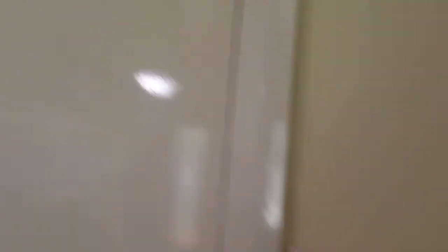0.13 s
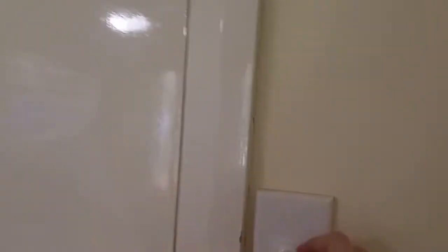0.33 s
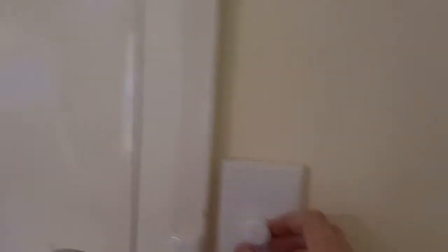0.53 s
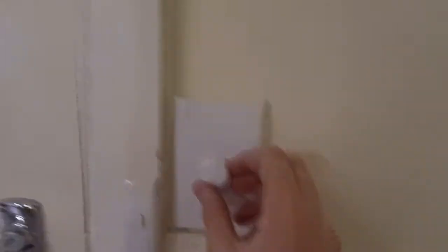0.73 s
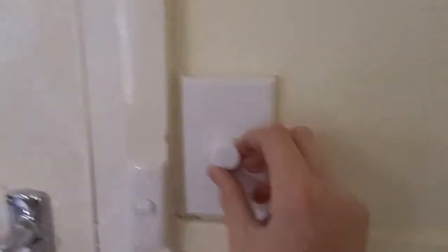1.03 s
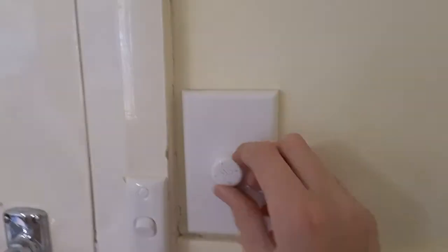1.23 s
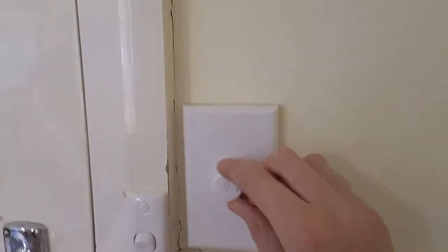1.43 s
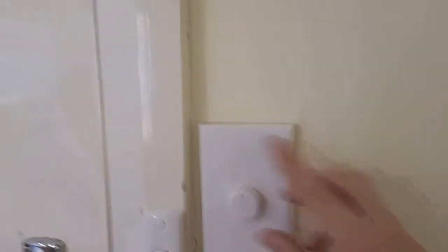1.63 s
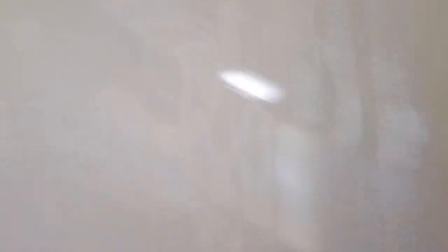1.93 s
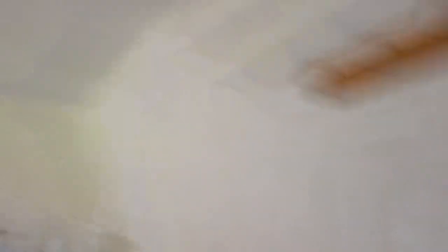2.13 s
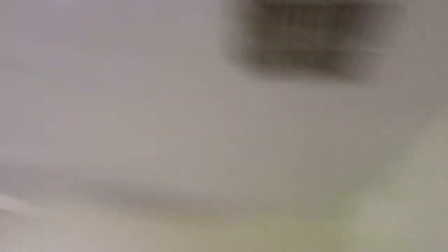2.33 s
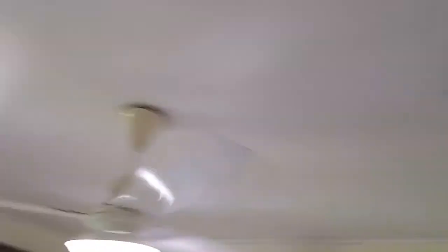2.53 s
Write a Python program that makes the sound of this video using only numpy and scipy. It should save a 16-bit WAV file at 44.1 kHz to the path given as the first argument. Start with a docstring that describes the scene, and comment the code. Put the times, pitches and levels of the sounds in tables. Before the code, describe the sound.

One sharp click from a knob on a wall plate follows some faint ticks and echoes briefly in a small room. A low fan hum swells and fades over faint hiss, with a soft microphone bump and sleeve rustle near the end.

```python
"""A rotary switch on a plastic wall plate is turned by hand: a few soft ticks, then one sharp snap
that rings the plate and echoes in a small, hard room. Fingers rub the knob. A fan hums low,
swelling and fading as the hand-held microphone moves through the room. After the snap the
microphone is bumped and a sleeve rustles. Faint hiss lies under it all."""
import sys
import numpy as np
from scipy import signal
from scipy.fft import rfft, irfft
from scipy.io import wavfile

SR = 44100
rng = np.random.default_rng(int(sys.argv[2]) if len(sys.argv) > 2 else 0)


def dump(signal):
    """Clip the signal to [-1, 1] and save it as 16-bit WAV at the path in sys.argv[1]."""
    limited = np.clip(np.atleast_2d(signal).T, -1, 1)
    pcm = np.round(limited * 32767).astype(np.int16)
    wavfile.write(sys.argv[1], SR, pcm)


N = 119070
TIME, FREQS = np.arange(N) / SR, np.fft.rfftfreq(N, 1 / SR)


def amp(db):
    """Turns decibels into a gain."""
    return 10 ** (np.asarray(db) / 20)


def pan(db):
    """Left and right gains that make the left side louder by db."""
    return amp(np.array([[.5], [-.5]]) * db)


def unit(x):
    """Scales a signal to an average power of 1."""
    return x / np.sqrt(np.mean(x ** 2) + 1e-20)


def fade(t, fade_s):
    """Dies away by 60 dB in fade_s, the fade time."""
    return np.exp(-np.log(1000) * t / fade_s)


def at_freq(table, hz):
    """Looks up a table along a logarithmic frequency axis."""
    freqs, values = np.transpose(table)
    return np.interp(np.log(hz + 1), np.log(freqs + 1), values)


def over_time(table):
    """Joins a table's points with straight lines, one value a sample."""
    return np.interp(TIME, *np.transpose(table))


def add(mix, start_s, sound):
    """Mixes in a stereo sound at start_s."""
    part = mix[:, round(start_s * SR):][:, :sound.shape[1]]
    part += sound[:, :part.shape[1]]


def wobble(hz):
    """A random wobble, up to about hz times a second."""
    return unit(irfft(rfft(rng.standard_normal(N)) * np.exp(-(FREQS / hz) ** 2), N))


def noise(colour, likeness=0):
    """Stereo noise; a likeness of 1 makes both sides the same."""
    left, other = rfft(rng.standard_normal((2, N)))
    right = likeness * left + np.sqrt(1 - likeness ** 2) * other
    return unit(irfft(np.array([left, right]) * amp(at_freq(colour, FREQS)), N))


def burst(colour, fade_s, treble_db=0, bass_db=0, treble_hz=3560, bass_hz=960, size=4096):
    """The sound of a tiny impact: a dying puff of noise with energy 1."""
    hz = abs(np.fft.fftfreq(size, 1 / SR))
    treble = treble_db * hz ** 6 / (hz ** 6 + treble_hz ** 6)
    bass = bass_db / (1 + (hz / bass_hz) ** 6)
    gain = amp(at_freq(colour, hz) + treble + bass)
    # a filter that makes no sound ahead of the hit
    response = np.fft.ifft(np.exp(signal.hilbert(np.log(gain)).conj())).real
    puff = rng.choice([-1., 1.], (2, size)) * fade(np.arange(size) / SR, fade_s)
    out = signal.fftconvolve(puff, response[None, :size // 2], axes=1)
    return out / np.linalg.norm(out, axis=1, keepdims=True)


# how loud the hum is at the moving microphone (time [s], level [dB])
HUM_LOUDNESS = [(0, -74), (.14, -69.5), (.24, -56), (.56, -47.5), (.7, -47.5), (.97, -44.5), (1.07, -48.5),
                (1.16, -45.5), (1.47, -43.5), (1.75, -45.5), (1.82, -50.5), (2.0, -46.5), (2.14, -50),
                (2.3, -51.5), (2.56, -67.5), (2.7, -81.5)]
# which side the hum is on (time [s], left minus right [dB])
HUM_SIDE = [(0, -8), (.25, -2.5), (.8, 0.4), (1.9, -0.8), (2.15, -3), (2.33, -6.5), (2.5, -15.5),
            (2.7, -24.5)]
# the motor's note (time [s], pitch [Hz])
MOTOR_PITCH = [(0.2, 106.9), (0.73, 107.6), (0.86, 108.2), (1.38, 106.9), (1.64, 106.4), (1.73, 108.4),
               (2.6, 108.9)]
# the fan's weaker tones (pitch [Hz], level against the motor's note [dB])
WEAK_TONES = [(156.4, -23.5), (291.3, -35.5), (79, -25)]


def fan_hum(left_lead_rad=.13, waver=.014):
    """The motor hums one clean note, with weaker tones wavering around it."""
    phase = 2 * np.pi * np.cumsum(over_time(MOTOR_PITCH)) / SR
    hum = np.sin(phase + np.array([[left_lead_rad], [0]]))
    for hz, db in WEAK_TONES:
        pitch = hz * (1 + waver * wobble(hz=12.05))
        hum += amp(db) * np.sin(2 * np.pi * np.cumsum(pitch) / SR)
    return np.sqrt(2) * amp(over_time(HUM_LOUDNESS)) * pan(over_time(HUM_SIDE)) * hum


# tone colour of the rushing air (frequency [Hz], level [dB])
AIR_COLOUR = [(20, -26), (40, -20.5), (52, -6.5), (80, -2), (130, -8.5), (180, -9), (230, -9.5),
              (320, -12.5), (420, -21), (700, -30.5), (1500, -35.5), (4000, -45.5)]
# how alike the air sounds left and right (frequency [Hz], likeness [0 to 1])
AIR_LIKENESS = [(30, 0.66), (70, 0.97), (150, 0.86), (280, 0.062), (600, 0.34), (4000, 0)]
# how loud the air is (time [s], level [dB])
AIR_LOUDNESS = [(0, -74.5), (.15, -75), (.4, -69), (.9, -66.5), (1.5, -66.5), (2.0, -67), (2.35, -69.5),
                (2.7, -74.5)]


def fan_air():
    """The fan pushes air with a low rush that swells and fades."""
    return amp(over_time(AIR_LOUDNESS)) * noise(AIR_COLOUR, at_freq(AIR_LIKENESS, FREQS))


# tone colour of the hiss (frequency [Hz], level [dB])
HISS_COLOUR = [(400, -3), (700, -3), (1100, -6.5), (1500, -5.5), (1900, -1.5), (2700, -8.5), (4000, -9.5),
               (5700, -14.5), (6600, -8), (8500, -6.5), (10000, -7.5), (15500, -5), (16200, -17.5)]


def hiss(level_db=-78.5):
    """Faint, steady noise in the background."""
    return amp(level_db) * noise(HISS_COLOUR, likeness=.028)


# bumps on the microphone (time [s], level [dB], left minus right [dB])
GRIP_BUMPS = [(0.024, -57.5, -8), (2.0715, -38, 13.5), (2.218, -67, 6)]
# the low notes of its case (pitch [Hz], level against the bump [dB], width [s])
CASE_NOTES = [(103.7, -2, 0.0088), (224, -20.5, 0.0059)]


def microphone_bumps():
    """The grip shifts, and each soft push makes the microphone's case thud."""
    out = np.zeros((2, N))
    for time_s, db, side_db in GRIP_BUMPS:
        t = TIME - time_s
        for hz, note_db, width in CASE_NOTES:
            thud = -np.exp(-(t / width) ** 2) * np.cos(2 * np.pi * hz * t)
            out += amp(db + note_db) * pan(side_db) * thud
    return out


# soft ticks (time [s], level [dB], treble boost [dB], left minus right [dB], bass boost [dB])
SOFT_TICKS = [(.511, -53.5, -5, 0, -6), (.553, -54.5, -7, 2, -6), (0.764, -45, 2, 3.5, 17.5),
              (1.275, -44, -3.5, -4, 9), (1.2795, -37, -11, 6, 2), (1.3899, -42.5, -18, -5, -10),
              (1.4163, -38.5, -16, 3, 9), (1.5456, -45.5, -12, 1.5, 16.5), (2.285, -45.5, 8, 2, -10)]
# tone colour of a tick (frequency [Hz], level [dB])
TICK_COLOUR = [(200, -16), (550, -2.5), (850, -3.5), (1300, 4), (1900, 5.5), (2700, 9.5), (3800, -2),
               (4600, 1.5), (5800, -6), (7800, 3), (11000, -8.5), (16000, -10.5)]
# tone colour of the room's answer to a tick (frequency [Hz], level [dB])
TICK_TAIL = [(500, 10), (1600, 6.5), (2800, -2.5), (8000, 0)]


def soft_ticks(fade_s=.019, room_db=-2.5):
    """Knocks as the fingers take hold, take up the slack and let go, and a low echo after the snap."""
    out = np.zeros((2, N))
    for time_s, db, treble_db, side_db, bass_db in SOFT_TICKS:
        add(out, time_s, amp(db) * pan(side_db) * burst(TICK_COLOUR, fade_s, treble_db, bass_db))
    return out + amp(room_db) * room(out, TICK_TAIL)


# how long the room rings (frequency [Hz], fade time [s])
ROOM_FADE = [(200, 1.05), (700, 0.07), (1500, 0.29), (3000, 0.27), (6000, 0.27), (9000, 0.27),
             (15000, 0.36)]


def room(sound, colour, build_s=.015):
    """Echoes off hard walls blur into a tail, each frequency dying at its own speed."""
    hz, t, bands = signal.stft(rng.standard_normal((2, SR)), SR, nperseg=256)
    fade_s = at_freq(ROOM_FADE, hz)[:, None]
    even_energy = np.sqrt(2 * np.log(1000) / fade_s / SR)  # ringing longer adds no energy
    bands = bands * fade(t, fade_s) * even_energy * amp(at_freq(colour, hz))[:, None]
    tail = signal.istft(bands, SR)[1]
    tail *= np.minimum(np.arange(tail.shape[1]) / SR / build_s, 1)
    return signal.fftconvolve(sound, tail, axes=1)[:, :N]


def friction(strokes, colour, grain_db=1.5):
    """Sliding surfaces make grainy noise that swells and fades with each stroke."""
    level = sum(amp(db) * np.exp(-((TIME - time_s) / width) ** 2 / 2) for time_s, width, db in strokes)
    grain = amp(grain_db * wobble(hz=207))
    return level * unit(noise(colour) * grain)


# finger strokes (time [s], width [s], level [dB])
FINGER_STROKES = [(.7, 0.026, -82.5), (.95, 0.15, -80.5), (1.8, 0.055, -84)]
# tone colour of the rubbing (frequency [Hz], level [dB])
FINGER_COLOUR = [(200, -4), (650, 2.5), (1000, -6.5), (1700, 1.5), (2250, 1.5), (2900, -17), (5000, -31),
                 (16000, -48)]


def finger_rub():
    """Fingers slide over the knob with a dull rub."""
    return friction(FINGER_STROKES, FINGER_COLOUR)


# the notes of the switch and its plate (pitch [Hz], left level [dB], right level [dB], fade time [s])
PLATE_NOTES = [(648, -65, -60, 0.18), (828, -63, -62.5, 0.17), (1327, -59, -55.5, 0.067),
               (2345, -43, -63, 0.026), (3210, -36.5, -44, 0.014), (3430, -29.5, -35.5, 0.0089),
               (4230, -46, -40, 0.0071), (5060, -39, -45, 0.016), (6660, -47, -35.5, .016),
               (7030, -37, -50, .012), (7266, -46, -30.5, 0.019), (7880, -40, -37, 0.012),
               (8440, -32, -50, 0.015), (10220, -49.5, -44, 0.014), (13300, -59, -42, 0.012)]


def plate_ring(rise_cycles=2.6, right_delay_s=.000042):
    """The struck plate rings. Low notes build up more slowly, and the right side hears it all later."""
    t = np.arange(SR // 4) / SR
    arrival = t - np.array([[0], [right_delay_s]])
    ring = np.zeros((2, len(t)))
    for hz, left_db, right_db, fade_s in PLATE_NOTES:
        note = np.sin(2 * np.pi * hz * arrival + rng.uniform(0, 2 * np.pi))
        rise = np.minimum(t * hz / rise_cycles, 1)
        ring += amp([[left_db], [right_db]]) * note * rise * fade(t, fade_s)
    return ring


# the switch snaps over and its contact bounces (time [s], level against crack_db [dB])
SNAP_HITS = [(1.3976, -2), (1.3971, -2.5), (1.3989, -2)]
# tone colour of the plastic's crack (frequency [Hz], level [dB])
CRACK_COLOUR = [(200, -40), (700, -21), (1800, -16.5), (3000, -11.5), (4400, -0.5), (5600, -9.5), (7500, 1),
                (10000, -6), (12000, -14.5), (14000, -7), (16500, -14.5)]
# echoes off the hand, door frame and door (delay [s], left level [dB], right level [dB])
NEAR_ECHOES = [(.0021, -20, -49.5), (.0046, -23, -8), (.0054, -19, -24), (.0207, -14, -22)]
# tone colour of the room's answer to the snap (frequency [Hz], level [dB])
SNAP_TAIL = [(200, -8.5), (450, -14.5), (600, -4), (820, -5), (1100, -13.5), (1400, -11.5), (2300, -20.5),
             (3200, -16.5), (4400, -13.5), (5600, -19), (7800, -17.5), (8550, -9), (9600, -21.5),
             (12000, -22.5), (16000, -28)]


def switch_snap(crack_db=-19.5, chatter_db=-16.5):
    """The switch cracks, chatters and rings its plate; nearby surfaces and the room answer."""
    direct, echoes, kick = np.zeros((3, 2, N))
    start_s = SNAP_HITS[0][0]
    add(direct, start_s, plate_ring())
    add(direct, start_s, amp(chatter_db) * burst(CRACK_COLOUR, fade_s=.018))
    for time_s, db in SNAP_HITS:
        add(direct, time_s, amp(crack_db + db) * burst(CRACK_COLOUR, fade_s=.005))
    for delay_s, left_db, right_db in NEAR_ECHOES:
        add(echoes, delay_s, amp([[left_db], [right_db]]) * direct)
    add(kick, start_s, np.ones((2, 1)))  # a one-sample click sets the room ringing
    return direct + echoes + room(kick, SNAP_TAIL)


# sleeve strokes (time [s], width [s], level [dB])
SLEEVE_STROKES = [(2.258, 0.023, -79.5), (2.291, 0.013, -79), (2.32, 0.036, -82.5), (2.62, .04, -83)]
# tone colour of the cloth (frequency [Hz], level [dB])
SLEEVE_COLOUR = [(300, -30), (1300, -10.5), (2000, -7), (4000, -10.5), (6000, -6), (7500, 3), (10000, 2),
                 (13000, 2.5), (16000, -7)]


def sleeve_rustle(side_db=13):
    """Cloth brushes by on the left with a bright rustle."""
    return pan(side_db) * friction(SLEEVE_STROKES, SLEEVE_COLOUR)


def scene():
    """Hand, switch, fan and hiss together."""
    hand = soft_ticks() + finger_rub() + sleeve_rustle() + microphone_bumps()
    return hand + switch_snap() + fan_hum() + fan_air() + hiss()


def record(dry):
    """Cuts away the very highest treble."""
    top_hz = 15950
    low_pass = signal.firwin(511, top_hz, window=("kaiser", 9), fs=SR)
    return signal.oaconvolve(dry, low_pass[None], "same")


dry = scene()
out = record(dry)
dump(out)
```